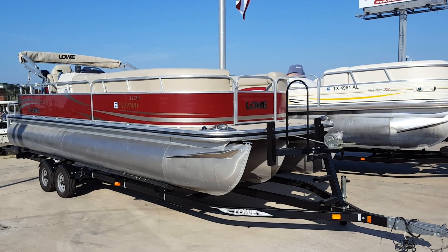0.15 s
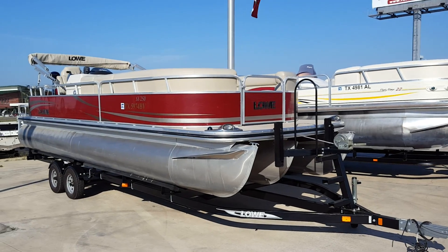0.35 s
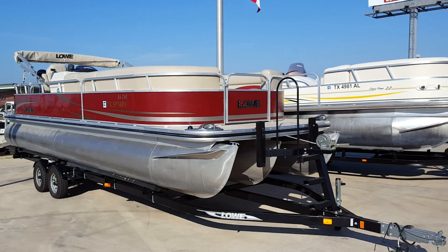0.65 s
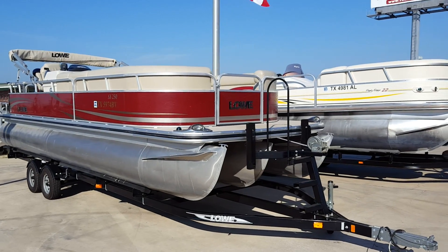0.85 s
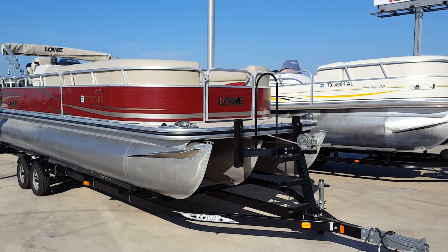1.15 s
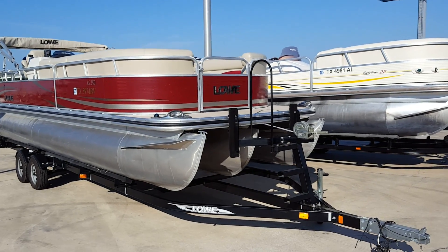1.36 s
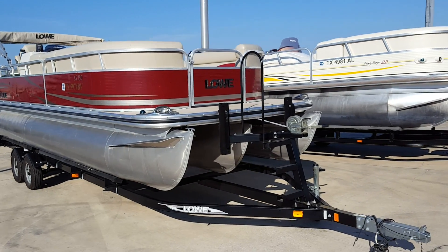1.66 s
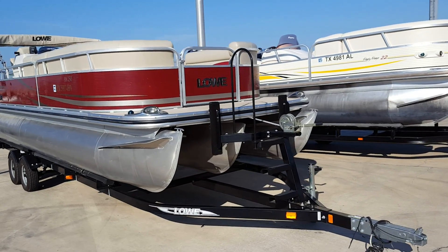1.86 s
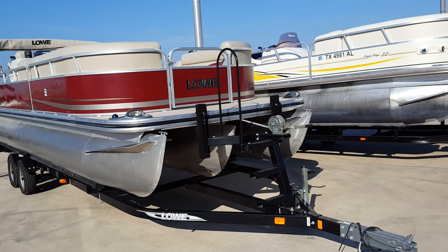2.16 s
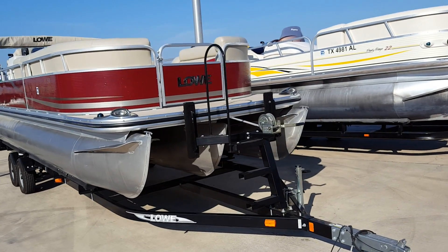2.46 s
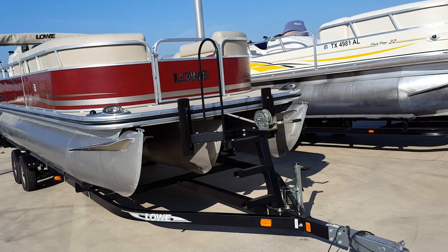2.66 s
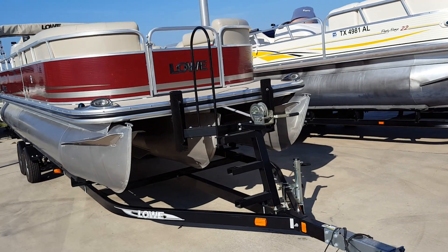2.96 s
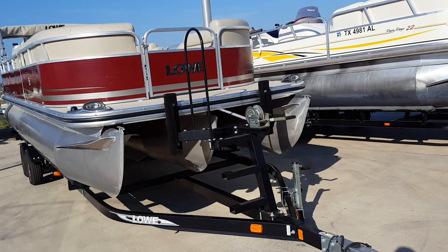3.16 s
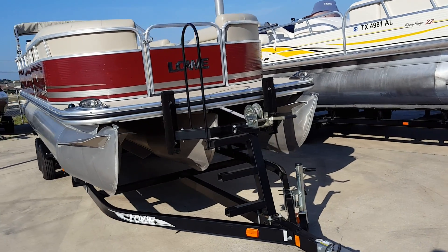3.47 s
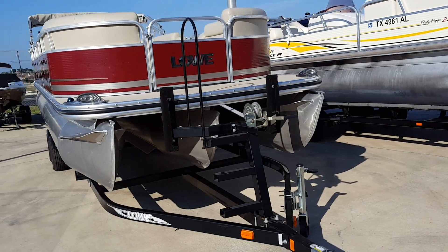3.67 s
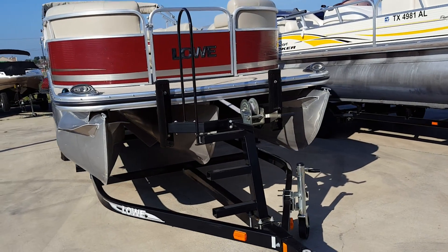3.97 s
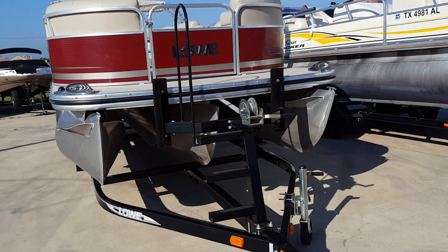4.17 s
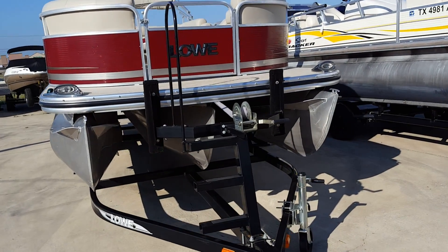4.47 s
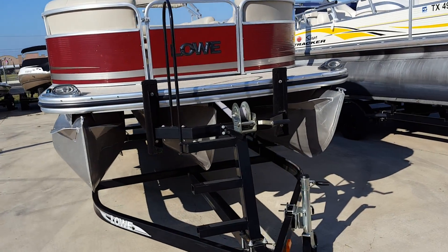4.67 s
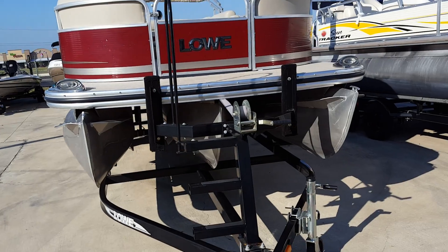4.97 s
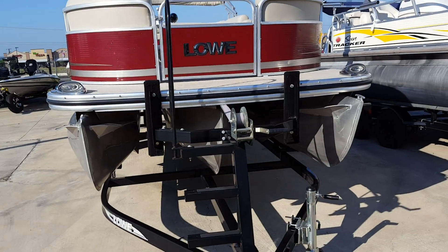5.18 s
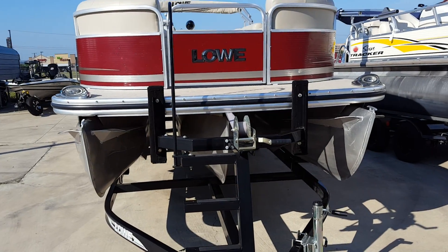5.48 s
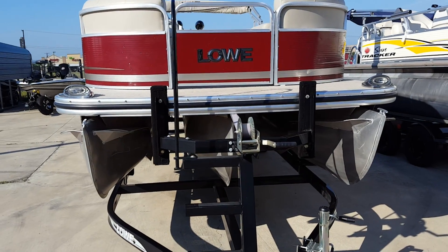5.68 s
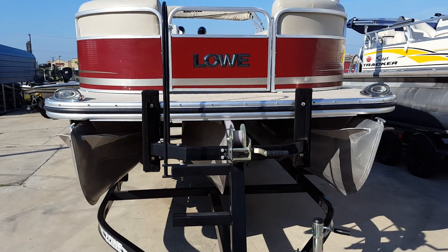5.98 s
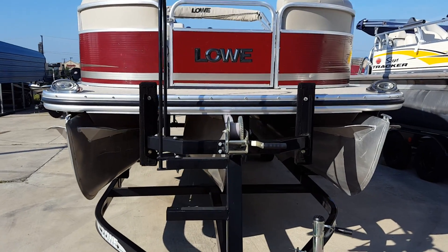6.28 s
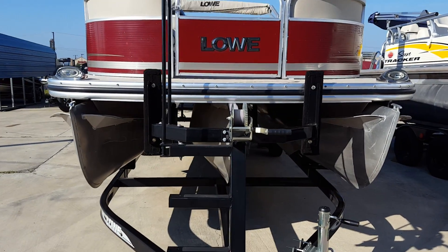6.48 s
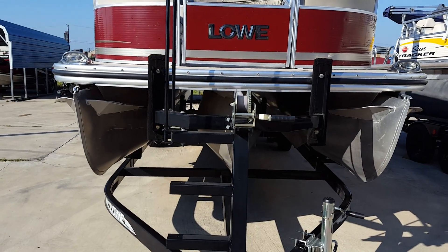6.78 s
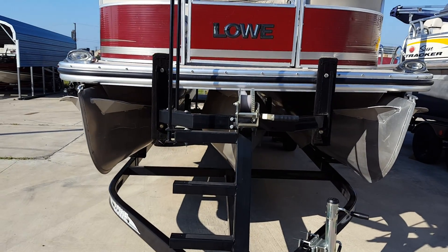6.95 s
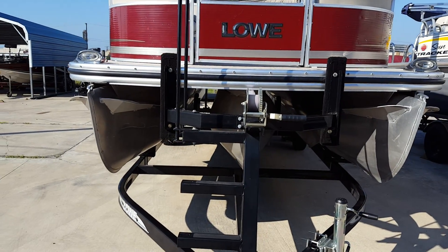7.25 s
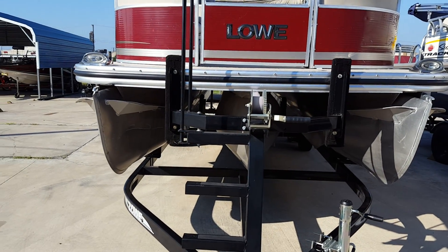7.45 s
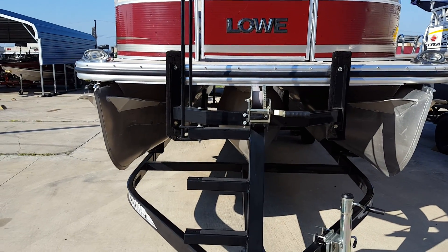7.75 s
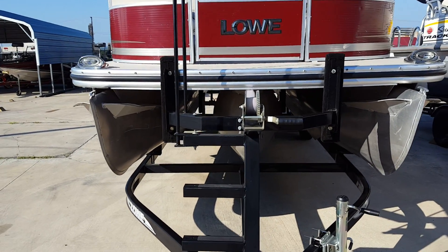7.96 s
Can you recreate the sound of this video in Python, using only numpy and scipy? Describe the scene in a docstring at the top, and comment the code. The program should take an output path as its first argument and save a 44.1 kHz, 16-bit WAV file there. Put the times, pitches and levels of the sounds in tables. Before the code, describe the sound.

A stereo outdoor ambience in an open concrete lot beside a road. From 0 s, a low blurred engine rumble, soft tyre roar and fine hiss continue steadily, with faint breeze and an unsteady drone near 110 Hz. A dull distant clank sounds at 0.1 s; small dry ticks and a short scuff cluster at 1.1-1.6 s. Rough exhaust noise grows around 4 s, and tyre hiss swells on the right, peaking near 4.5 s. A faint bird chirps at 4.7 s. Around 5.1 s a deep exhaust passes, its pitch dropping, then burbles strongly with wavering level, rising slightly after 6.4 s. A scuff and sharp close grit snap come at 5.5-5.6 s, a tick at 5.8 s, and more clicks and soft scuffing at 6.2-6.8 s. A gruff truck swells near 7.5 s, with tiny chirps at 7.4-8 s.

```python
"""Engines drone under a wash of tyre noise, heard from an open lot with boats and sheds by a road.
After five seconds a deep exhaust goes by, drops in pitch and pulls away; a gruffer truck follows.
Ticks and scuffs on concrete sound close by, and a small bird chirps far off.
Engines are sums of shaky sine waves; tyres, rumble and breeze are shaped noise; ticks and scuffs are
short bursts of noise; a snapping piece of grit is a set of dying sine waves."""
import sys
import numpy as np
from scipy import signal
from scipy.fft import rfft, irfft, next_fast_len
from scipy.io import wavfile
from scipy.ndimage import uniform_filter1d

SR = 44100
rng = np.random.default_rng(int(sys.argv[2]) if len(sys.argv) > 2 else 0)


def master_out(mix):
    """Clip the mix to full scale and print it as 16-bit PCM to the path in sys.argv[1]."""
    frames = np.transpose(np.atleast_2d(mix))
    ceiling = np.clip(frames, -1, 1)
    pcm = np.round(ceiling * 32767).astype(np.int16)
    wavfile.write(sys.argv[1], SR, pcm)


N = 358091
TIME = np.arange(N) / SR  # seconds

# All spectrum tables give relative strength; each noise gets its overall level separately.
# light air on each microphone: pitch_hz, density_db (per Hz)
BREEZE_SPECTRUM = [(20, -23), (60, -2), (120, 4.5), (200, -1), (400, -20.5), (1000, -60), (4000, -100)]
BREEZE_DB = -44.5

# many engines blurred into a low rumble: pitch_hz, density_db (per Hz)
RUMBLE_SPECTRUM = [(20, -30.5), (35, -26.5), (50, -15.5), (70, -6), (100, -1.5), (135, -1.5), (172, -8),
                   (210, -7), (245, -19.5), (400, -28.5), (1000, -68)]
# steady, with one broad swell
RUMBLE_DB = -32.5
RUMBLE_SWELL_S, RUMBLE_SWELL_DB, RUMBLE_SWELL_WIDTH_S = 5.5, 2, 1.7
# rough exhaust noise above the rumble: pitch_hz, density_db (per Hz)
BLARE_SPECTRUM = [(100, -26), (180, -3), (220, 2), (295, -0.5), (340, -3.5), (415, -9.5), (490, -11),
                  (600, -12), (900, -24.5), (2000, -65.5)]
# it grows around four seconds, before the exhaust goes by
BLARE_DB, BLARE_GROWTH_DB, BLARE_GROW_S, BLARE_EASE_S = -41, 5, 4.1, 0.57

HUM_HZ, HUM_DB = 40.6, -46  # an idling engine
# wavering drone near 110 Hz, from the exhaust that is coming closer: time_s, pitch_hz, level_db
DRONE = [(0, 119.1, -38), (.55, 107.8, -31.5), (.8, 108, -36), (1.25, 115.9, -34.5), (1.7, 103.9, -37.5),
         (2.9, 107.8, -37.5), (3.25, 108.2, -31), (3.46, 107.5, -51), (3.7, 108.6, -28), (4.2, 112, -36.5),
         (4.8, 113.8, -38.5), (5.03, 107, -27), (5.2, 98.6, -36)]
# fainter engine lines, each on one even glide; some may belong to the approaching exhaust:
# start_s, end_s, start_hz, end_hz, level_db
FAINT_LINES = [(0.04, 2.206, 145.5, 145.5, -34), (2, 4.2, 149, 159, -39.5), (4, 8.12, 139, 139.5, -38),
               (-0.5, 0.41, 180, 193, -41.5), (2.1, 4.1, 190, 196.5, -39), (1.5, 3.3, 209, 217, -43),
               (3.4, 4.9, 86, 76, -40.5), (3.6, 4.6, 91, 78, -39.5)]

# the side the road noise comes from: time_s, side (-1 right to 1 left, no unit)
BEARING = [(0, .54), (2, .3), (3, -.4), (5.5, -.3), (6.2, .5), (7.2, -0.26)]
# left minus right in the road noise: pitch_hz, difference_db
TILT = [(60, 0.5), (150, 0.5), (330, -1), (500, 1), (770, -3), (1170, -1.5), (1790, -5.5), (2740, -4.5),
        (4190, -4), (6400, -10.5), (7400, -5.5), (8300, 1.5), (10000, -2.5), (15000, -0.5)]
DIRECT_SHARE = 0.23  # share of the road noise that arrives straight along the road
# roar of tread on the road: pitch_hz, density_db (per Hz)
ROAR_SPECTRUM = [(200, -11.5), (400, -2.5), (600, -3.5), (850, 2.5), (1080, 0.5), (1350, -5.5),
                 (1750, -5.5), (2400, -10.5), (3200, -17), (4500, -22), (7000, -36), (10000, -54)]
# finer tyre hiss: pitch_hz, density_db (per Hz)
HISS_SPECTRUM = [(1000, -19), (3000, -0.5), (4200, -1.5), (5400, -2.5), (6300, -1.5), (7400, 3),
                 (8100, 1.5), (8800, -9.5), (9600, -28), (16000, -46.5)]
# the finest fizz: pitch_hz, density_db (per Hz)
FIZZ_SPECTRUM = [(6000, -27), (8500, 4), (9500, -0.5), (10500, -2.5), (12500, -0.5), (16000, -5)]
# treble level that roar, hiss and fizz follow: time_s, level_db
TREBLE = [(0.0, -57), (0.13, -54), (0.42, -52), (0.78, -55.5), (1.12, -55), (1.27, -54), (2.19, -52),
          (2.66, -53.5), (3.89, -53), (4.88, -54.5), (5.26, -55.5), (6.61, -55.5), (7.23, -59),
          (8.04, -57.5)]
TREBLE_USUAL_DB = -54.5
# each layer: level at the usual treble (dB), and dB gained per dB of treble
ROAR_DB, ROAR_FOLLOWS = -38.5, .25
HISS_DB, HISS_FOLLOWS = -51.5, 1.43
FIZZ_DB, FIZZ_FOLLOWS = -66, 2.2
# thin steady hiss around 5 kHz that comes up after five and a half seconds:
# pitch_hz, density_db (per Hz)
THIN_HISS_SPECTRUM = [(1000, -48), (3300, -18), (4100, -7.5), (5300, -0.5), (6200, -6.5), (8000, -18),
                      (9500, -48.5)]
THIN_HISS_S, THIN_HISS_EASE_S, THIN_HISS_DB = 5.6, .12, -57.5
# one nearer car, hissing past on the right: pitch_hz, density_db (per Hz)
NEAR_HISS_SPECTRUM = [(700, -9), (1600, 1), (2400, -10.5), (3350, 5), (3750, 4), (4150, -1), (5000, -16),
                      (6000, -12.5), (7300, 0.5), (8200, -10.5), (9200, -24), (16000, -45)]
NEAR_CAR_S, NEAR_CAR_DB, NEAR_CAR_WIDTH_S = 4.46, -49, 1.24

# a small bird far off: start_s, length_s, start_hz, end_hz, level_db (peak, before roughness and echo)
CHIRPS = [(4.654, 0.048, 3330, 3600, -51), (4.705, .085, 3550, 3460, -57), (7.37, .04, 3950, 4080, -60),
          (7.51, .045, 4120, 3970, -58), (7.98, .11, 3830, 3500, -57)]

# ticks and a far clank: start_s, level_db (before the decay and soft start), centre_hz,
# half_width_octaves, decay_t60_s, left_minus_right_db
TICKS = [(.115, -30.5, 830, 0.28, 0.52, 0), (1.139, -34.5, 6100, .38, 0.033, -8),
         (1.274, -49, 7000, 0.73, .025, 0), (1.325, -34, 1600, .2, .036, -5),
         (1.626, -43, 8000, 0.25, .097, 2), (5.83, -38, 2680, 0.18, 0.088, -3),
         (6.187, -52, 9000, .35, 0.076, -3), (6.497, -33, 2600, 0.77, 0.054, -9.5),
         (6.653, -41, 3497, .89, 0.036, -7), (6.687, -43, 5000, 0.74, .04, -4),
         (6.725, -33, 1800, 0.77, 0.051, -6)]
# scuffs on the concrete: peak_s, half_length_s, level_db
SCUFFS = [(1.222, .013, -34.5), (5.49, 0.083, -41), (6.76, 0.15, -46.5)]
# sound of the scuffing grains: pitch_hz, density_db (per Hz)
SCUFF_SPECTRUM = [(200, -20), (600, -1), (1200, 0), (2100, -1.5), (3000, -13.5), (7500, -16.5),
                  (10000, -41)]
GRAINS_PER_S = 1500
# a piece of grit snaps and settles: start_s, level_db, pitch_factor (no unit)
SNAPS = [(5.5731, -17, 0.99), (5.5788, -23, 0.5)]
# what it rings with, before the pitch factor: pitch_hz, level_db (within the ring), decay_t60_s
SNAP_MODES = [(400, -11, .014), (680, -5, .011), (1110, -6, 0.012), (1750, -8, .007), (2900, -2, .0063),
              (3470, -3, 0.0039), (4750, -9, 0.0039), (6900, -13, 0.0048)]

# a truck pulling away under load: time_s, shaft_rate_hz, level_db
TRUCK = [(6.5, 20.7, -45), (7.0, 20.84, -34.5), (7.25, 21, -33), (7.5, 21.1, -26.5), (7.72, 21.14, -35.5),
         (7.9, 21.16, -32), (8.12, 21.1, -34.5)]
# its orders: multiple of the shaft rate (no unit), level_db (within the cluster)
TRUCK_ORDERS = [(9, -0.5), (10, -0.5), (12, -9), (13, -13), (14, -10.5), (14.5, -12.5), (23, -22.5),
                (25, -19), (29, -21.5)]

# the passing exhaust: its pulse rate drops as it goes by, then climbs a little as it pulls away
APPROACH_HZ, PAST_HZ, PULLING_HZ = 75.9, 57.88, 59.9
PASS_S, PASS_EASE_S = 5.09, 0.1498
PULL_S, PULL_EASE_S = 6.42, .17
ARRIVE_S, ARRIVE_EASE_S = 5.02, .07  # its lowest order is heard first
OPEN_S, OPEN_EASE_S = 5.225, 0.11  # the others open up once the tailpipe faces the microphone
FIRST_DB, SECOND_DB, UPPER_DB = -31, -22.5, -31
# its upper orders: multiple of the pulse rate (no unit), level_db (added to UPPER_DB)
UPPER_ORDERS = [(3, -5), (3.5, -6.5), (4, -7.5), (4.5, -15.5), (5, -16.5), (6, -31), (7, -24), (8, -25.5)]
# brief dips of its first order: centre_s, depth_db, half_width_s
FIRST_DIPS = [(5.95, 6, 0.34), (7.41, 10, 0.16), (7.92, 11, 0.23)]
# brief dips of its second order: centre_s, depth_db, half_width_s
SECOND_DIPS = [(5.39, 4.3, 0.088), (6.5, 9.8, 0.17), (7.1, 8.3, .12), (7.92, 7, 0.094)]

EDGE_HZ = 15760  # the treble is cut off here


def amp(db):
    """Turns decibels into a gain."""
    return 10 ** (np.asarray(db) / 20)


def evened(x):
    """Scales to an average strength (rms) of 1."""
    return x / np.sqrt(np.mean(x ** 2) + 1e-20)


def read(points, hz):
    """Reads a spectrum table at the given pitches, along a log-frequency axis."""
    f, value = np.transpose(points)
    return np.interp(np.log(hz + 1), np.log(f + 1), value)


def follow(rows, t=TIME):
    """Reads the columns of a curve table at the times t."""
    s, *columns = np.transpose(rows)
    return [np.interp(t, s, column) for column in columns]


def step(s, ease_s):
    """A smooth rise from 0 to 1, halfway at s."""
    return (1 + np.tanh((TIME - s) / (2 * ease_s))) / 2


def bell(s, width_s):
    """A smooth swell from 0 to 1 and back, highest at s."""
    return np.exp(-((TIME - s) / width_s) ** 2)


def dipped(db, dips):
    """The gain of a steady level with brief dips in it."""
    drop_db = sum(depth_db * bell(s, width_s) for s, depth_db, width_s in dips)
    return amp(db - drop_db)


def fade(start, end, seconds=0.23):
    """Lets an engine sound emerge from the traffic and sink back into it."""
    outside_s = np.maximum(start - TIME, TIME - end)
    return np.clip(1 - outside_s / seconds, 0, 1)


def wander(rate_hz):
    """A random drift of rms 1, with little movement faster than rate_hz."""
    t = np.arange(4096) / 400
    hz = np.fft.rfftfreq(len(t), t[1])
    slow = irfft(rfft(rng.standard_normal(len(t))) / (1 + (hz / rate_hz) ** 4))
    return evened(np.interp(TIME, t, slow))


def panned(db):
    """Left and right gains for a level difference, left minus right."""
    return amp(np.array([[db], [-db]]) / 2)


def add(mix, s, sound):
    """Adds a short sound to the mix at s seconds."""
    part = mix[:, round(s * SR):][:, :sound.shape[1]]
    part += sound[:, :part.shape[1]]


def shaped_noise(noise, spectrum):
    """Colours two channels of noise with a spectrum table."""
    count = next_fast_len(N)
    gain = amp(read(spectrum, np.fft.rfftfreq(count, 1 / SR)))
    return evened(irfft(rfft(noise, count) * gain, count)[:, :N])


def road_noise(spectrum, direct_share, bearing, patchy_db, size, spacing_ms=0.422):
    """Noise from the road at two spaced microphones; moving air makes it patchy."""
    hop = size // 4
    t = np.arange(N // hop + 5) * hop / SR
    hz = np.fft.rfftfreq(size, 1 / SR)
    a, b, c, d, patches = rng.standard_normal((len(t), len(hz), 5)).T
    patches = uniform_filter1d(patches, size=14, axis=0)  # smooth over pitch, then over time
    patches = evened(uniform_filter1d(patches, size=16, axis=1))
    direct = np.clip(direct_share, 0, 1)
    side = np.clip(follow(bearing, t)[0], -1, 1)
    # sound along the road reaches one microphone late; scattered sound is alike only in the bass
    lag = 2 * np.pi * hz[:, None] * spacing_ms / 1000
    along_road = np.cos(lag) - 1j * side * np.sin(lag)
    alike = direct * along_road + (1 - direct) * np.sinc(lag / np.pi)
    left = a + 1j * b
    right = alike * left + np.sqrt(np.maximum(1 - abs(alike) ** 2, 0)) * (c + 1j * d)
    tilt_db = read(TILT, hz)[:, None] / 2
    pair = np.array([left * amp(tilt_db), right * amp(-tilt_db)])
    pair = pair * amp(read(spectrum, hz)[:, None] + patchy_db * patches)
    return evened(signal.istft(pair, nperseg=size, noverlap=size - hop)[1][:, :N])


def engine_note(turns, flutter, flutter_hz):
    """One engine order, its strength and phase shaken by uneven firing and moving air."""
    shake = 1 + flutter * (wander(flutter_hz) + 1j * wander(flutter_hz))
    spin = np.exp(2j * np.pi * (turns + rng.random()))
    return evened((shake * spin).real)


def breeze():
    """A faint low flutter of air, unrelated between the two microphones."""
    return amp(BREEZE_DB) * shaped_noise(rng.standard_normal((2, N)), BREEZE_SPECTRUM)


def rumble():
    """Many engines blur into a low rumble, with rougher exhaust noise above it."""
    low_db = RUMBLE_DB + RUMBLE_SWELL_DB * bell(RUMBLE_SWELL_S, RUMBLE_SWELL_WIDTH_S)
    blare_db = BLARE_DB + BLARE_GROWTH_DB * step(BLARE_GROW_S, BLARE_EASE_S)
    low = road_noise(RUMBLE_SPECTRUM, DIRECT_SHARE, BEARING, patchy_db=1.0, size=4096)
    blare = road_noise(BLARE_SPECTRUM, DIRECT_SHARE, BEARING, patchy_db=1.0, size=2048)
    return amp(low_db) * low + amp(blare_db) * blare


def engine_drones():
    """An idling hum, the wavering drone of the approaching exhaust, and fainter engine lines."""
    out = amp(HUM_DB) * engine_note(HUM_HZ * TIME, flutter=.08, flutter_hz=3)
    hz, db = follow(DRONE)
    drone = engine_note(np.cumsum(hz) / SR, flutter=0.25, flutter_hz=7.1)
    out = out + fade(DRONE[0][0], DRONE[-1][0]) * amp(db) * drone
    for start, end, start_hz, end_hz, db in FAINT_LINES:
        hz = np.interp(TIME, [start, end], [start_hz, end_hz])
        note = engine_note(np.cumsum(hz) / SR, flutter=0.42, flutter_hz=5.3)
        out = out + fade(start, end) * amp(db) * note
    return out * panned(-.4)


def tyres():
    """Roar of tread on the road, finer hiss that only the nearer cars carry this far, and a thin hiss."""
    swell_db = follow(TREBLE)[0] - TREBLE_USUAL_DB
    roar_db = ROAR_DB + ROAR_FOLLOWS * swell_db
    hiss_db = HISS_DB + HISS_FOLLOWS * swell_db + 0.6 * wander(rate_hz=40)
    fizz_db = FIZZ_DB + FIZZ_FOLLOWS * swell_db + .7 * wander(rate_hz=25)
    thin_gain = amp(THIN_HISS_DB) * step(THIN_HISS_S, THIN_HISS_EASE_S)
    roar = amp(roar_db) * road_noise(ROAR_SPECTRUM, DIRECT_SHARE, BEARING, patchy_db=1.1, size=1024)
    hiss = amp(hiss_db) * road_noise(HISS_SPECTRUM, DIRECT_SHARE, BEARING, patchy_db=1.7, size=512)
    fizz = amp(fizz_db) * road_noise(FIZZ_SPECTRUM, 0, BEARING, patchy_db=2.3, size=512)
    thin = thin_gain * road_noise(THIN_HISS_SPECTRUM, DIRECT_SHARE, BEARING, patchy_db=1.7, size=512)
    return roar + hiss + fizz + thin


def near_car():
    """Tyre hiss that swells and fades, arriving almost straight from the right."""
    hiss = road_noise(NEAR_HISS_SPECTRUM, .95, [(0, -.8)], patchy_db=1.6, size=1024)
    return amp(NEAR_CAR_DB) * bell(NEAR_CAR_S, NEAR_CAR_WIDTH_S) * hiss


def bird(echo_t60=.12, wet=1.0, rough=0.95):
    """Short, rough whistles that slide and settle, blurred by echoes from the boats and sheds."""
    out = np.zeros((2, N))
    for s, length, start_hz, end_hz, db in CHIRPS:
        u = np.linspace(0, 1, round(length * SR))  # progress through the chirp
        hz = end_hz + (start_hz - end_hz) * (1 - u) ** 2
        whistle = np.sin(np.pi * u) * np.sin(2 * np.pi * np.cumsum(hz) / SR)
        add(out, s, amp(db) * whistle * panned(-2))
    out = out * evened(1 + rough * wander(rate_hz=110))
    t = np.arange(SR // 4) / SR
    tail = rng.standard_normal((2, len(t))) * amp(-60 * t / echo_t60)
    tail = tail / np.linalg.norm(tail[0])
    return out + wet * signal.oaconvolve(out, tail, axes=1)[:, :N]


def ticks(rise_share=0.021):
    """Dying bursts of noise, each in its own band; the longer ones start more softly."""
    out = np.zeros((2, N))
    t = np.arange(SR // 2) / SR
    hz = np.fft.rfftfreq(len(t), 1 / SR)
    for s, db, centre_hz, width, t60, pan_db in TICKS:
        band = 1 / (1 + (np.log2((hz + 1) / centre_hz) / width) ** 4)
        burst = evened(irfft(rfft(rng.standard_normal((2, len(t)))) * band, len(t)))
        soft_start = 1 - np.exp(-t / (rise_share * t60))
        add(out, s, burst * amp(db - 60 * t / t60) * soft_start * panned(pan_db))
    return out


def scuffs():
    """Grit rubbed over concrete: sparse random grains under a soft swell."""
    grains = rng.standard_normal((2, N)) * (rng.random(N) < GRAINS_PER_S / SR)
    rasp = shaped_noise(grains, SCUFF_SPECTRUM)
    swells = sum(amp(db) * bell(s, half_s) for s, half_s, db in SCUFFS)
    return rasp * swells * panned(-5.5)


def grit():
    """A sharp snap that rings for a few milliseconds, duller at the later contact."""
    out = np.zeros((2, N))
    t = np.arange(SR // 20) / SR
    for s, level_db, pitch in SNAPS:
        ring = np.zeros(len(t))
        for k, (hz, db, t60) in enumerate(SNAP_MODES):
            sign = (-1) ** k  # every other mode starts downward
            ring += sign * amp(db - 60 * t / t60) * np.sin(2 * np.pi * hz * pitch * t)
        add(out, s, amp(level_db) * ring * panned(-5))
    return out


def truck():
    """A higher, gruffer engine: a cluster of shaft orders that swells with the load."""
    hz, level_db = follow(TRUCK)
    turns = np.cumsum(hz) / SR
    # uneven shaft speed smears each order in proportion to its multiple
    orders = sum(amp(db) * engine_note(k * turns, flutter=0.03 * k, flutter_hz=.9 * k)
                 for k, db in TRUCK_ORDERS)
    return fade(TRUCK[0][0], TRUCK[-1][0]) * amp(level_db) * orders * panned(-.8)


def passing_exhaust():
    """Two strong, clean low orders and a burble of weaker ones, all on one shared pulse rate."""
    drop_hz = (PAST_HZ - APPROACH_HZ) * step(PASS_S, PASS_EASE_S)
    climb_hz = (PULLING_HZ - PAST_HZ) * step(PULL_S, PULL_EASE_S)
    turns = np.cumsum(APPROACH_HZ + drop_hz + climb_hz) / SR
    first = dipped(FIRST_DB, FIRST_DIPS) * engine_note(turns, flutter=.042, flutter_hz=8)
    second = dipped(SECOND_DB, SECOND_DIPS) * engine_note(2 * turns, flutter=.11, flutter_hz=7)
    upper = sum(amp(db) * engine_note(k * turns, flutter=0.078 * k, flutter_hz=7)
                for k, db in UPPER_ORDERS)
    arriving = step(ARRIVE_S, ARRIVE_EASE_S) * first
    opening = step(OPEN_S, OPEN_EASE_S) * (second + amp(UPPER_DB) * upper)
    return (arriving + opening) * panned(-.1)


def scene():
    """Adds up the background, the small close sounds and the passing vehicles."""
    background = breeze() + rumble() + engine_drones() + tyres() + near_car() + bird()
    close_by = ticks() + scuffs() + grit()
    return background + close_by + truck() + passing_exhaust()


def record(dry):
    """The recorder's band limit: a steep low-pass filter."""
    low_pass = signal.firwin(1023, EDGE_HZ, window=("kaiser", 9), fs=SR)
    return signal.oaconvolve(dry, low_pass[None], "same")


dry = scene()
out = record(dry)
master_out(out)
```